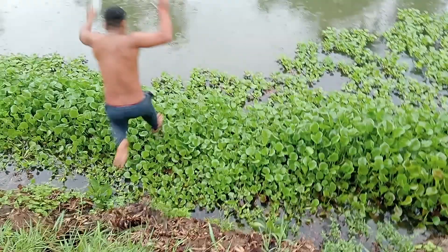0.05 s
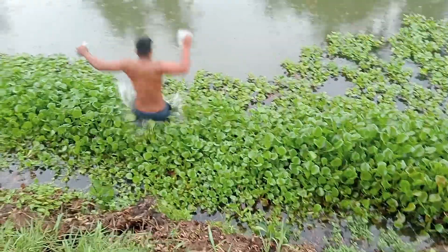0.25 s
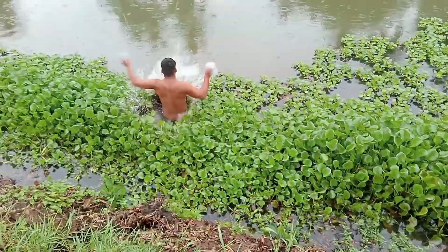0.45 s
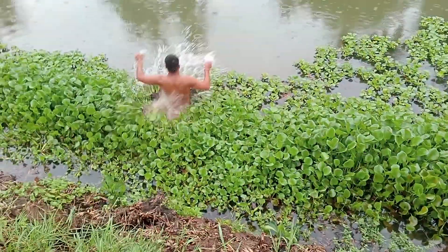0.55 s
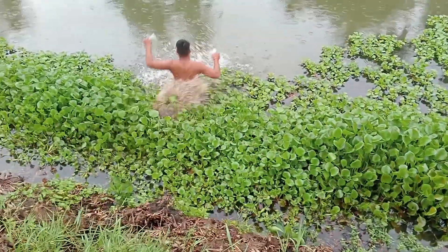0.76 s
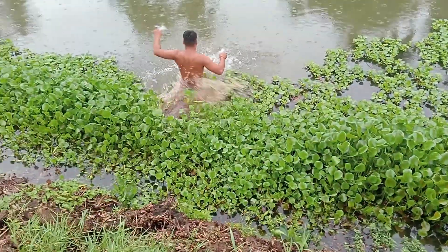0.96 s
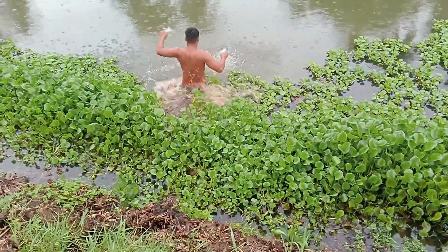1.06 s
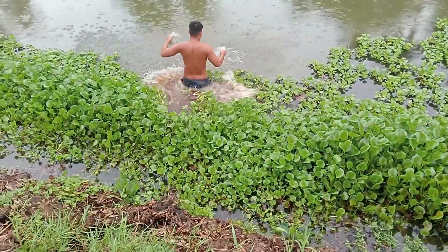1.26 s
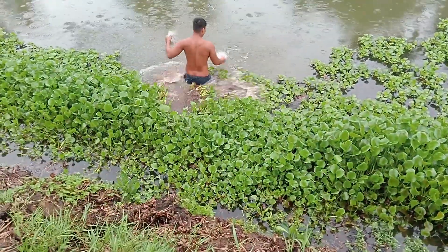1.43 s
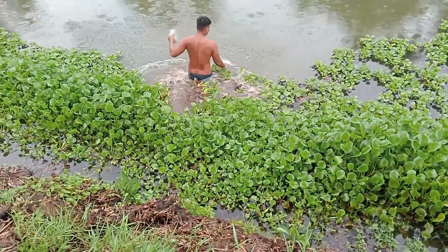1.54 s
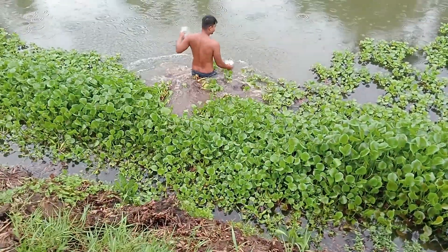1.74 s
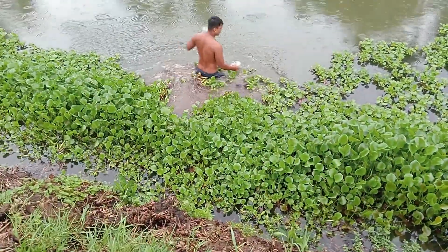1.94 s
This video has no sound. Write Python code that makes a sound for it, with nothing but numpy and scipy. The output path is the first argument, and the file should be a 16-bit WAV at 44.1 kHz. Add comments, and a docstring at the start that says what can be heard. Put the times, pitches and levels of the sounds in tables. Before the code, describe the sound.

A person plunges into a weedy pond with a sharp slap, deep gulps and falling spray

```python
"""Insects shrill on the bank over a faint outdoor rumble; then a person jumps through floating plants
into a pond. The surface tears and the body slaps it (shaped noise), the air cavity closes with a deep gulp
(decaying, rising sines), thrown water falls back (random clicks), and a second wash settles into drips
(tick, ring and tiny splash). The water reaches the microphone coloured by its path, with scatter from
the bank and leaves; the insects and the distant air are bands of noise."""
import sys
import numpy as np
from scipy import signal
from scipy.fft import rfft, irfft
from scipy.io import wavfile

SR = 44100
rng = np.random.default_rng(int(sys.argv[2]) if len(sys.argv) > 2 else 0)


def unload_audio(sound):
    """Save the sound as a 16-bit wav file, at the path given as the first command line argument."""
    columns = np.transpose(np.atleast_2d(sound))
    # keep every value between -1 and 1, then stretch to whole-number steps
    steps = np.round(np.clip(columns, -1, 1) * 32767)
    wavfile.write(sys.argv[1], SR, steps.astype(np.int16))


N = 88200
TIME = np.arange(N) / SR  # s

# spectrum of the insect chorus on the bank: f/Hz, level/dB
INSECT_TONE = [(6500, -60), (7600, -14), (8050, -12.5), (8350, -13.5), (8850, -4), (9120, 0.5), (9450, -3),
               (9900, -18.5), (11000, -40.5)]
INSECT_DB = -42
INSECT_FLUTTER_HZ, INSECT_FLUTTER_DB = 69.6, 1  # fast wander of the level, depth as rms
INSECT_SWELL_HZ, INSECT_SWELL_DB = 24, 0.6  # slower wander, depth as rms

# spectrum of the distant rumble and outdoor hiss: f/Hz, level/dB
AIR_TONE = [(20, -36), (40, -15), (62, 1.5), (85, 5), (115, 4.5), (170, -5), (300, -1), (480, -12.5),
            (1000, -22.5), (3400, -7.5), (4500, -25.5), (8000, -31), (15500, -27)]
AIR_DB = -49

# thrown water falling back: t/s, splatter level/dB, fine spray level/dB
FALLBACK_LEVELS = [(0, -46, -42.5), (.05, -51, -50), (.18, -40.5, -49), (.24, -38.5, -34.5),
                   (.31, -30.5, -33), (.41, -31.5, -38.5), (.45, -35.5, -35.5), (.49, -28.5, -32.5),
                   (.56, -29, -34), (.62, -32.5, -37.5), (.69, -32.5, -34.5), (.745, -37.5, -38),
                   (.92, -36.5, -38), (.99, -38.5, -40.5), (1.12, -35.5, -39), (1.18, -33.5, -33),
                   (1.265, -35.5, -33.5), (1.31, -41.5, -43.5), (1.47, -44, -45.5), (1.65, -47.5, -54),
                   (1.82, -52, -53.5), (2, -54.5, -63)]
# spectrum of the splatter: f/Hz, level/dB
SPLATTER_TONE = [(100, -28.5), (500, -12), (900, 0.5), (1800, 1), (2800, 0.5), (3600, -1), (4300, -6.5),
                 (8000, -23)]
# spectrum of the fine spray: f/Hz, level/dB
SPRAY_TONE = [(1500, -25.5), (3500, -7.5), (5000, 0), (7000, 0.5), (10000, -1.5), (13000, -8), (15500, -8)]
SPRAY_PER_S = 6000  # mean drops per second
PLINK_DB = -6  # tiny trapped bubbles relative to the patter

# near drops and flicked leaves: t/s, level/dB, f/Hz
DRIPS = [(.090, -23, 1940), (0.1639, -28, 2430), (.190, -21, 1800), (.8574, -19.5, 3500),
         (.9828, -25.5, 3320), (1.040, -17.5, 1850), (1.3668, -22.5, 2930), (1.3817, -20, 1420),
         (1.421, -30, 4400), (1.492, -21, 1950), (1.534, -28.5, 2450), (1.598, -24.5, 3320),
         (1.722, -28, 2780), (1.75, -28, 1730), (1.808, -27.5, 2170), (1.8627, -29, 1680),
         (1.9441, -27, 2310), (1.953, -24.5, 3230), (1.973, -28, 1710)]
# spectrum of a drip's tick and splash: f/Hz, level/dB
DRIP_TONE = [(300, -30), (1000, -4), (1800, 3), (3600, 6.5), (4500, -3), (9000, -4), (15500, -33.5)]
DRIP_RING_S, DRIP_SPLASH_S = 0.00082, 0.0055  # decay times
DRIP_RING_DB, DRIP_SPLASH_DB, DRIP_TICK_DB = -2, -13.5, -4  # relative to the level of the drip

# surface tearing as feet, legs and hips go in: t/s, level/dB
ENTRY_LEVELS = [(.185, -60), (.205, -34.5), (.217, -48), (.224, -22), (.238, -26), (.246, -33), (.258, -20),
                (.266, -17.5), (.277, -17.5), (.284, -16), (.293, -20.5), (.31, -38.5), (.35, -55)]
# spectrum of the tearing surface: f/Hz, level/dB
ENTRY_TONE = [(50, -23), (110, -15), (230, -5), (450, -4), (800, -2.5), (1700, 0), (4000, -1.5),
              (8000, -7.5), (11000, -11.5), (15500, -17.5)]
# slaps of the body on the water: t/s, level/dB, decay/s
SLAPS = [(.2022, -26, 0.0012), (.2797, -15, 0.00077), (.2813, -6, 0.0011), (.2834, -12, 0.00094)]
# spectrum of a slap: f/Hz, level/dB
SLAP_TONE = [(60, -37), (250, -8), (1000, 1), (2200, 6), (4500, -16.5), (7500, 4), (10000, -1),
             (15500, -39)]

# churned-in air: t/s, large bubbles level/dB, small bubbles level/dB
CHURN_LEVELS = [(.19, -67, -68), (.23, -59, -51), (.28, -35.5, -34.5), (.36, -40, -34.5), (.385, -32, -30),
                (.45, -35, -34), (.495, -27.5, -30), (.56, -31.5, -25), (.6, -30.5, -33.5),
                (.64, -36.5, -30.5), (.69, -34.5, -33.5), (.735, -40.5, -37), (.82, -46, -41.5),
                (.91, -53, -49.5), (1.03, -46.5, -40.5), (1.12, -58, -45.5), (1.18, -53, -40),
                (1.29, -54.5, -49), (1.6, -58, -56), (2, -64, -63)]
# spectrum of the large bubbles: f/Hz, level/dB
LARGE_TONE = [(35, -29), (60, -21.5), (90, -5), (170, 0.5), (300, -4), (450, -4.5), (700, -26.5)]
# spectrum of the small bubbles: f/Hz, level/dB
SMALL_TONE = [(300, -11), (480, -3), (640, 3), (850, -1.5), (1100, -4), (1600, -10)]
# single big bubbles pinching off: t/s, starting f/Hz, level/dB, decay/s
GULPS = [(.219, 865, -16, 0.0028), (.313, 880, -17.5, 0.0046), (.375, 633, -19, 0.008),
         (.408, 760, -22.5, 0.0093), (0.436, 103.5, -27, 0.034), (.475, 79, -27.5, 0.046),
         (.487, 843, -18, 0.0047), (0.494, 272, -18.5, 0.013), (0.522, 177, -13, 0.02),
         (.524, 463, -16, 0.0071), (.537, 240, -23, 0.0087), (.557, 145.7, -15, 0.015),
         (.58, 251, -23, 0.015), (.668, 254, -25, .015), (.69, 344, -23, 0.013),
         (1.147, 840, -29.5, 0.0094), (1.165, 633, -29, 0.01), (1.187, 769, -30.5, 0.023)]
BUBBLE_RISE = 0.036  # fraction of the starting pitch gained per decay time
BUBBLE_ONSET_S = 0.0011  # time constant for a gulp to start ringing

# bursts of flung droplets landing on water and leaves: t/s, level/dB, decay/s
SPATTERS = [(.652, -32, 0.025), (.712, -42, 0.0073), (0.798, -28.5, 0.01), (.857, -30, .01),
            (0.919, -29.5, 0.018), (1.151, -32, 0.018), (1.487, -33, 0.01), (1.581, -44, 0.011),
            (1.597, -35, 0.0078), (1.678, -34.5, 0.01), (1.691, -36.5, .012), (1.748, -43, .004),
            (1.806, -46, .004)]
# spectrum of the flung droplets: f/Hz, level/dB
SPATTER_TONE = [(500, -11), (1600, -5), (3500, 1.5), (6500, -0.5), (9000, -1), (15500, -13)]
SPATTER_ATTACK_S = 0.0017

# drops of like size land together: width, duration and rms depth of these patches
PATCH_HZ, PATCH_S, PATCH_DB = 260, 0.015, 1.52

# colour of the path from the water to the microphone: f/Hz, level/dB
PATH_COLOUR = [(25, -16), (55, -3), (80, 0), (300, 0), (490, -2), (660, 2), (900, 1), (1100, -4),
               (1330, -3), (1440, 3), (1560, -5), (1680, 3), (1850, 2), (2030, -6), (2180, -3), (2330, 4),
               (2480, -2), (2720, -2), (3000, 1), (3200, -2), (3480, 2), (4000, -2), (4650, -2), (4850, 0),
               (5600, -1), (6400, 1), (7100, 0), (7500, -2), (8200, -3), (9000, 0)]
BANK_DB, BANK_DECAY_S = -12.5, 0.058  # scatter from the bank and the leaves
CUTOFF_HZ = 15560  # upper limit of the recorder


def amp(db):
    """Decibels to gain."""
    return 10 ** (np.asarray(db) / 20)


def unit(x):
    """Scales to rms 1."""
    return x / np.sqrt(np.mean(x ** 2) + 1e-20)


def level(table, axis=1):
    """Gain over time from one dB column of a table."""
    rows = np.array(table)
    return amp(np.interp(TIME, rows[:, 0], rows[:, axis]))


def add(mix, s, sound):
    """Mixes a sound in, in place, from time s."""
    part = mix[max(0, round(s * SR)):][:len(sound)]
    part += sound[:len(part)]


def colour(x, tone):
    """Causal minimum-phase filter with the given (Hz, dB) response."""
    hz, db = np.transpose(tone)
    bins_hz = abs(np.fft.fftfreq(8192, 1 / SR))
    bins_db = np.interp(np.log(bins_hz + 1), np.log(hz), db)
    log_gain = np.log(amp(bins_db))
    # the Hilbert transform of the log gain gives the minimum phase
    response = np.exp(np.conj(signal.hilbert(log_gain)))
    taps = np.fft.ifft(response).real[:4096]
    return signal.fftconvolve(x, taps)[:len(x)]


def flutter(rate_hz, depth_db):
    """Random gain that wanders up to about the given rate, with an rms depth in dB."""
    rolloff = 1 + (np.fft.rfftfreq(N, 1 / SR) / rate_hz) ** 4
    slow = irfft(rfft(rng.standard_normal(N)) / rolloff, N)
    return amp(depth_db * unit(slow))


def impacts(per_s, spread_db):
    """Random clicks of uneven size and either sign."""
    size = amp(spread_db * np.minimum(rng.exponential(1, N), 4))
    sign = rng.choice([-1, 1], N)
    return size * sign * (rng.random(N) < per_s / SR)


def bubble(hz, decay_s):
    """A dying sine that rises as the bubble nears the surface."""
    t = TIME[:int(6 * decay_s * SR) + 2]
    turns = hz * t * (1 + BUBBLE_RISE * t / decay_s / 2)
    return np.sin(2 * np.pi * turns) * np.exp(-t / decay_s)


def cloud(lo_hz, hi_hz, per_s, cycles, spread_db, count=28):
    """Many bubbles of count sizes, each with a decay time of a few cycles."""
    pitches = np.geomspace(lo_hz, hi_hz, count) * rng.uniform(.97, 1.03, count)
    total = np.zeros(N)
    for hz in pitches:
        starts = impacts(per_s / count, spread_db)
        ringing = signal.oaconvolve(starts, bubble(hz, cycles / hz))[:N]
        total += hz * ringing  # higher pitches weighted up
    return total


def patchy(x):
    """Lets narrow ranges of pitch swell and sink at random."""
    z = signal.stft(x, nperseg=512)[2]
    across = np.fft.fftfreq(z.shape[0], SR / 512)[:, None] * PATCH_HZ
    along = np.fft.fftfreq(z.shape[1], 256 / SR) * PATCH_S
    # noise over pitch and time, blurred into patches
    blur = np.exp(-2 * np.pi * (across ** 2 + along ** 2))
    field = np.fft.ifft2(np.fft.fft2(rng.standard_normal(z.shape)) * blur).real
    return signal.istft(z * amp(PATCH_DB * unit(field)), nperseg=512)[1][:N]


def insects():
    """A chorus on the bank merged into one shrill, fluttering band of noise."""
    pulsing = flutter(INSECT_FLUTTER_HZ, INSECT_FLUTTER_DB) * flutter(INSECT_SWELL_HZ, INSECT_SWELL_DB)
    chorus = colour(rng.standard_normal(N), INSECT_TONE)
    return amp(INSECT_DB) * unit(chorus * pulsing)


def air():
    """Distant rumble and soft outdoor hiss, as shaped noise."""
    return amp(AIR_DB) * unit(colour(rng.standard_normal(N), AIR_TONE))


def falling_water():
    """Clumps of drops patter down, some trapping tiny bubbles, under a finer spray."""
    clumps = flutter(rate_hz=92, depth_db=1.15)
    patter = unit(colour(impacts(per_s=3500, spread_db=1.0), SPLATTER_TONE))
    tiny_bubbles = cloud(998, 4470, per_s=1300, cycles=4.8, spread_db=3.0)
    plinks = unit(colour(tiny_bubbles, SPLATTER_TONE))
    splatter = unit(patter + amp(PLINK_DB) * plinks) * level(FALLBACK_LEVELS, axis=1)
    spray = unit(colour(impacts(SPRAY_PER_S, spread_db=1.5), SPRAY_TONE))
    spray = spray * level(FALLBACK_LEVELS, axis=2)
    return clumps * patchy(splatter + spray)


def drips():
    """Each near drop is a tick, a short ring and a tiny splash."""
    out, t = np.zeros(N), TIME[:SR // 10]
    tick = colour(1. * (t == 0), DRIP_TONE)
    tick = tick / abs(tick).max()
    for s, db, hz in DRIPS:
        hiss = unit(colour(rng.standard_normal(len(t)), DRIP_TONE))
        splash = hiss * np.exp(-t / DRIP_SPLASH_S)
        add(out, s, amp(db + DRIP_SPLASH_DB) * splash)
        add(out, s, amp(db + DRIP_TICK_DB) * tick)
        add(out, s, amp(db + DRIP_RING_DB) * bubble(hz, DRIP_RING_S))
    return out


def entry():
    """Dense hiss of the tearing surface, topped by the slaps of the body as dying noise bursts."""
    hiss = colour(rng.standard_normal(N), ENTRY_TONE)
    water = unit(patchy(hiss)) * level(ENTRY_LEVELS)
    for s, db, decay_s in SLAPS:
        slap = unit(colour(rng.choice([-1., 1.], N), SLAP_TONE))
        add(water, s, amp(db) * np.exp(-TIME / decay_s) * slap)
    return water


def trapped_air():
    """The cavity breaks into big gulps and clouds of large and small ringing bubbles."""
    large = cloud(58.8, 494, per_s=1100, cycles=2.12, spread_db=1.5)
    large = unit(colour(large, LARGE_TONE)) * level(CHURN_LEVELS, axis=1)
    small = cloud(386.6, 1358, per_s=970, cycles=4.56, spread_db=1.0)
    small = unit(colour(small, SMALL_TONE)) * level(CHURN_LEVELS, axis=2)
    gulps = np.zeros(N)
    for s, hz, db, decay_s in GULPS:
        ring = bubble(hz, decay_s)
        onset = 1 - np.exp(-TIME[:len(ring)] / BUBBLE_ONSET_S)
        add(gulps, s, amp(db) * ring * onset)
    return large + small + gulps


def spatters():
    """Each burst is a brief shower of fine droplets: random clicks under a quick rise and decay."""
    bursts = np.zeros(N)
    for s, db, decay_s in SPATTERS:
        attack = 1 - np.exp(-TIME / SPATTER_ATTACK_S)
        add(bursts, s, amp(db) * attack * np.exp(-TIME / decay_s))
    return bursts * unit(colour(impacts(per_s=4100, spread_db=1.5), SPATTER_TONE))


def bank(x):
    """Adds short outdoor scatter: sparse random echoes, dying away, from 3 ms on."""
    t = TIME[:SR // 4]
    sparse = rng.standard_normal(len(t)) * (rng.random(len(t)) < .1)
    tail = sparse * np.exp(-t / BANK_DECAY_S) * (t > .003)
    return x + amp(BANK_DB) * signal.fftconvolve(x, tail / np.linalg.norm(tail))[:N]


def scene():
    """The splash heard from the bank, among the insects."""
    splash = falling_water() + drips() + entry() + trapped_air() + spatters()
    water = colour(splash, PATH_COLOUR)
    return (bank(water) + insects() + air())[None]


def record(dry):
    """The recorder's band limit, a steep low-pass."""
    low_pass = signal.firwin(1201, CUTOFF_HZ, window=("kaiser", 9), fs=SR)
    return signal.oaconvolve(dry, low_pass[None], "same")


dry = scene()
out = record(dry)
unload_audio(out)
```